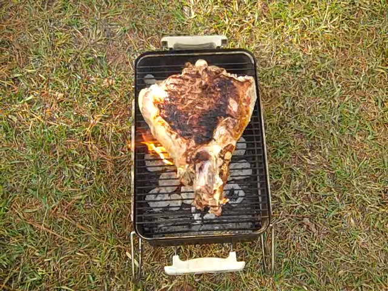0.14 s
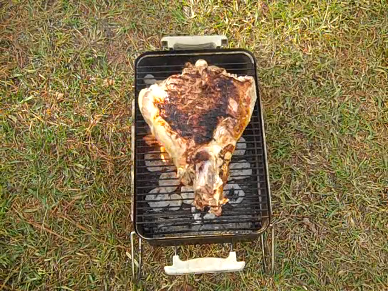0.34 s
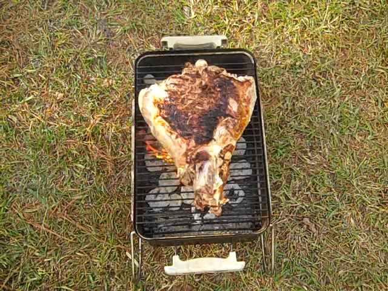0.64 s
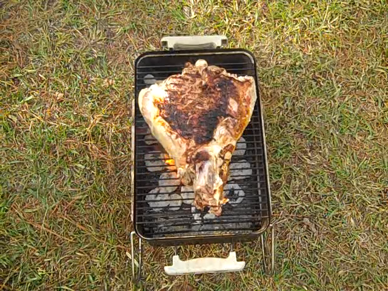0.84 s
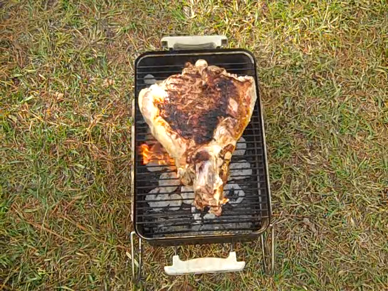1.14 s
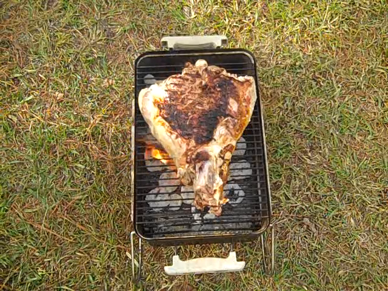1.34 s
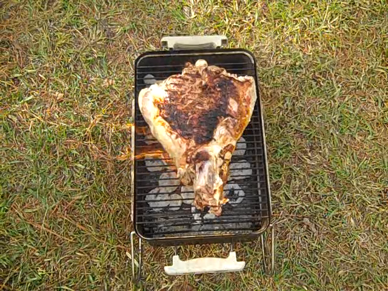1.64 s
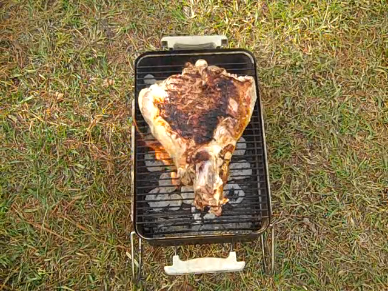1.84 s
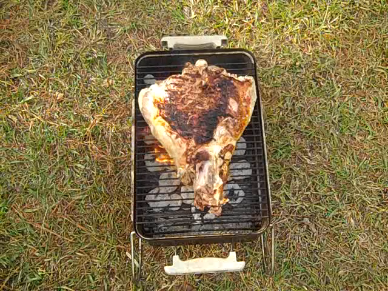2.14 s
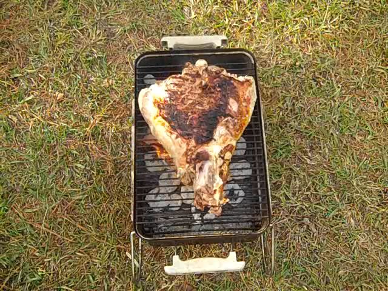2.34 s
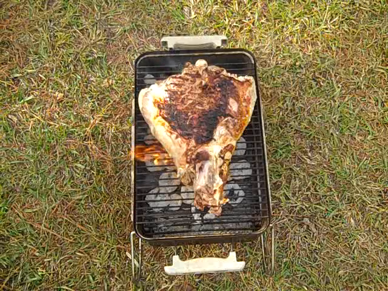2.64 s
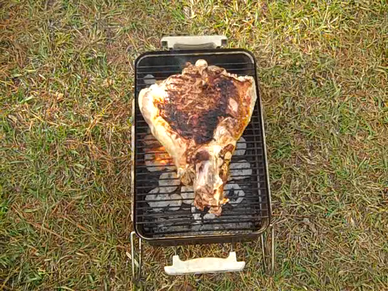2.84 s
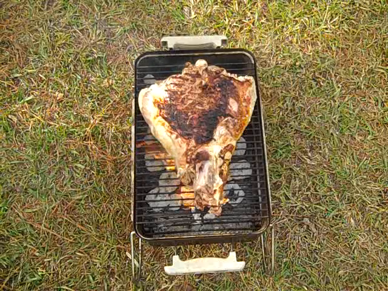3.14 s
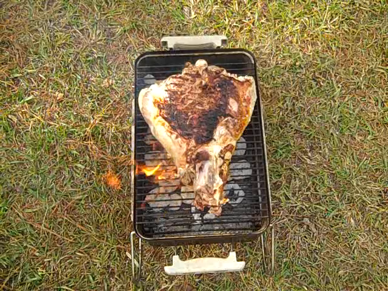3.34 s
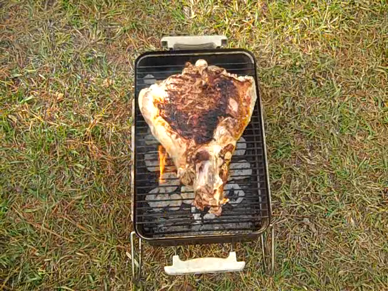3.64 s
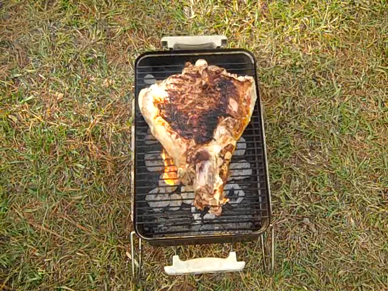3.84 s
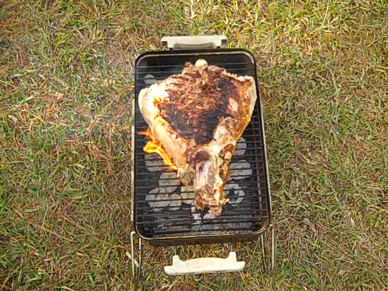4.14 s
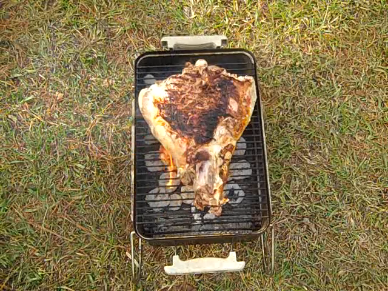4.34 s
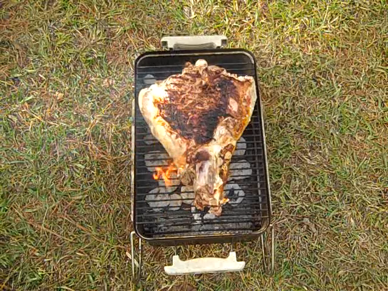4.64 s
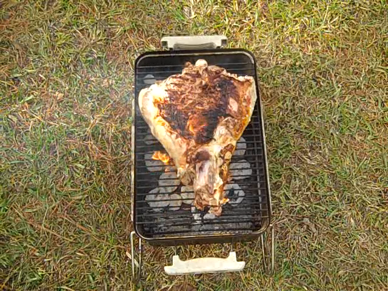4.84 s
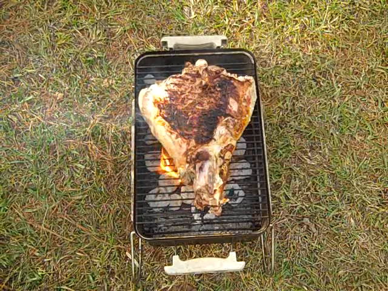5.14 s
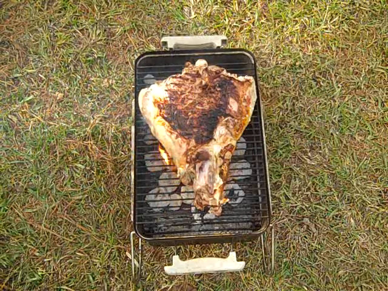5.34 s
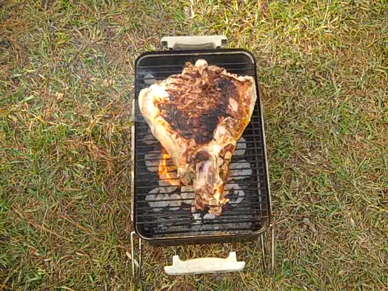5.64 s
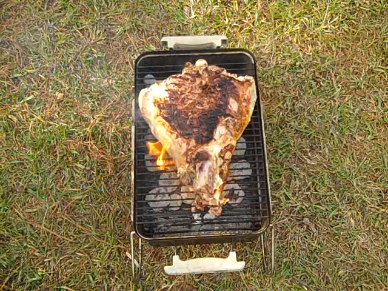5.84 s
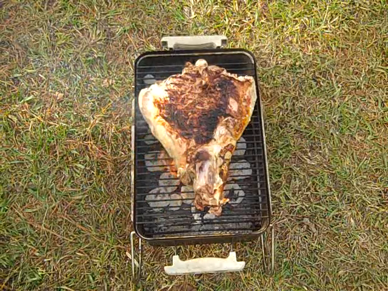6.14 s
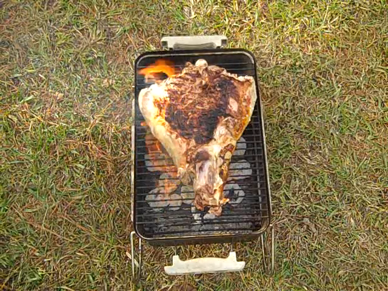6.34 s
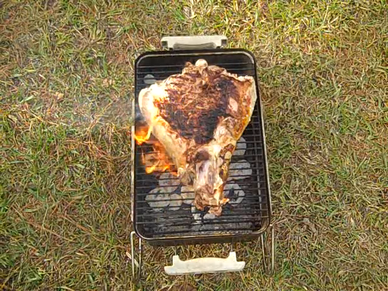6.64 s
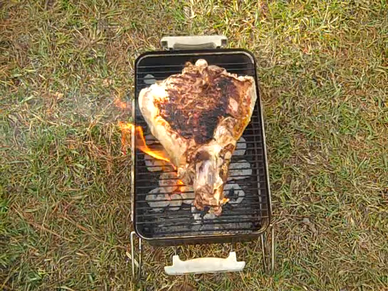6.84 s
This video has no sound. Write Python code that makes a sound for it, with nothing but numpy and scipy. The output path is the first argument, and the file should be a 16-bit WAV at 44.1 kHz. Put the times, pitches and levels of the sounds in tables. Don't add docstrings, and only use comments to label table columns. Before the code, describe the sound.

Close outdoor sound of meat sizzling on a small charcoal grill. A fine, bright, uneven hiss runs throughout, swelling briefly as fat drips on the coals. Sharp pops, thin spits and dry coal cracks scatter over it, with a few dull plops ringing in the shallow metal box. Very faint wind and low rumble lie underneath. One microphone about a metre above, dry and without echo.

```python
import sys
import numpy as np
from scipy import signal
from scipy.fft import rfft, irfft, next_fast_len
from scipy.io import wavfile
from scipy.ndimage import uniform_filter1d

SR = 44100
rng = np.random.default_rng(int(sys.argv[2]) if len(sys.argv) > 2 else 0)


def transcribe(signal):
    frames = np.atleast_2d(signal).T
    limited = np.clip(frames, -1, 1)
    pcm = np.round(limited * 32767).astype(np.int16)
    wavfile.write(sys.argv[1], SR, pcm)


def amplitude_ratio(level_db):
    exponent = np.asarray(level_db, float) / 20
    return 10 ** exponent


N = 308259
LEAD = 128


def unit(x):
    return x / np.sqrt(np.mean(x ** 2))


def colour(x, points):
    hz, db = np.transpose(points)
    size = next_fast_len(N + 4096)
    log_hz = np.log(np.arange(size // 2 + 1) * SR / size + 1e-9)
    gain = amplitude_ratio(np.interp(log_hz, np.log(hz), db))
    return irfft(rfft(x, size) * gain, size)[:N]


def ring(x, modes):
    return sum(amplitude_ratio(db) * signal.lfilter(*signal.iirpeak(hz, hz / width, SR), x) for hz, width, db in modes)


def fade(x, ms):
    return signal.lfilter([1], [1, -np.exp(-1000 / (ms * SR))], x)


def walk(rate):
    hold = int(SR / rate)
    steps = np.repeat(rng.standard_normal(N // hold + 1), hold)
    slewed = uniform_filter1d(uniform_filter1d(steps, hold), hold)
    return unit(slewed[:N])


def place(times, shapes):
    out = np.zeros(N + shapes.shape[1])
    starts = (times * SR).astype(int)[:, None]
    np.add.at(out, starts + np.arange(shapes.shape[1]), shapes)
    return out[:N]


def below(x, hz):
    return signal.sosfiltfilt(signal.butter(2, hz, fs=SR, output="sos"), x)


# time in seconds, treble sizzle level in dB.
SIMMER = [
    (0, -44.5),
    (.95, -45.5),
    (2.0, -42.5),
    (2.6, -43),
    (3.15, -44.5),
    (3.7, -43.5),
    (4.8, -45),
    (5.9, -45),
    (6.99, -46.5),
]
# middle in seconds, length in seconds, rise in dB,
# lean to the middle in dB.
FAT_DRIPS = [(0.252, .3, 4.5, 1), (.46, .06, 5, 0.5), (0.597, .06, 3, -2.5), (0.749, .08, 4, -3),
             (0.854, .07, 7.5, -1.5), (1.154, .08, 6.5, -1), (1.268, .07, 7, 0), (1.352, .07, 5.5, 1.5),
             (1.619, .12, 7.5, -4), (1.86, 0.09, 4, 0.5), (1.949, .12, 5.5, 0.5), (2.15, .07, 3, 1.5),
             (2.243, .06, 2.5, -3), (2.33, .06, 2, -0.5), (2.82, .14, 5.5, 2), (2.904, .06, 6, -1.5),
             (3.02, .14, 6, 0.5), (3.222, .08, 3, 2.5), (3.481, .14, 5.5, 0), (3.892, .08, 4.5, -3.5),
             (4.018, .09, 4.5, 0), (4.303, .16, 6.5, -0.5), (4.532, .16, 4.5, 2.5), (5.162, .3, 6.5, 4),
             (5.443, .07, 9, 0), (5.619, .07, 8, 1.5), (5.722, .12, 5, 1.5), (5.913, .08, 3, 2),
             (6.288, .12, 6, 1.5), (6.815, .1, 4, 3)]


def boiling():
    t = np.arange(0, N + 64, 64) / SR
    middle_s, length_s, rise_db, lean_db = np.transpose(FAT_DRIPS)[:, :, None]
    shape = np.exp(-np.abs(2 * (t - middle_s) / length_s) ** 2.2)
    added_power = np.sum((amplitude_ratio(rise_db) ** 2 - 1) * shape, axis=0)
    flare_db = 10 * np.log10(1 + np.maximum(added_power, 0))
    simmer_db = np.interp(t, *np.transpose(SIMMER))
    slow = simmer_db, flare_db, np.sum(lean_db * shape, axis=0)
    return [np.interp(np.arange(N) / SR, t, db) for db in slow]


# frequency in Hz, level in dB per Hz.
BURST_COLOUR = [(700, -26), (1000, -12), (1330, -7), (1630, -.5), (1900, -3), (3100, -5), (6000, 0),
                (7300, -1), (8900, 0), (11200, -5), (13300, -10)]
# frequency in Hz, width in Hz, level in dB.
FIRE_BOX = [
    (501, 150, -14),
    (710, 1050, -22.5),
    (1540, 420, -6),
    (2880, 240, -14),
]


def voices():
    click = (np.arange(N) == LEAD) * 1.
    direct = colour(click, BURST_COLOUR)
    lows = [below(direct, hz) for hz in (3500, 5300, 7600, 10500)] + [direct]
    hum = ring(ring(click, FIRE_BOX[:2]), [(602, 380, 0)])
    middle = lows[0] + amplitude_ratio(-8) * ring(click, FIRE_BOX[2:])
    return np.array([hum, middle, *np.diff(lows, axis=0)])[:, :8 * LEAD]


def sizzle(rate=900, spread_db=2.0, cap_db=10, steam_db=-1.5, own_db=7):
    simmer_db, flare_db, lean_db = boiling()
    treble_db = simmer_db + flare_db
    middle_db = -6 + (0.72 - 1) * flare_db + lean_db
    slow_flare_db = uniform_filter1d(flare_db, int(.08 * SR))
    hum_db = -7 + 0.56 * slow_flare_db - flare_db

    flutter = walk(30)
    chance = rng.random((2, N))
    born = chance[0] < rate / SR * amplitude_ratio(2.2 * flutter)
    size_db = np.minimum(-spread_db * np.log(chance[1] + 1e-9), cap_db)
    noise = rng.standard_normal(N)

    heard = voices()
    heard[2:] /= np.sqrt(np.sum(heard[2:].sum(axis=0) ** 2))
    heard[:2] /= np.sqrt(np.sum(heard[:2] ** 2, axis=1, keepdims=True))
    levels = [treble_db + hum_db - 3.5, treble_db + middle_db - 2.5] + [treble_db - 3] * 4
    out = 0
    for voice, db in zip(heard, levels):
        bursts = born * amplitude_ratio(size_db + own_db * rng.standard_normal(N).clip(-2, 1.5))
        gate = unit(unit(fade(bursts, .55)) + amplitude_ratio(steam_db))
        patchy_db = 1.2 * walk(3) + 1.6 * walk(9) + 1.1 * walk(25)
        level_db = db + 0.38 * flutter + patchy_db
        out = out + signal.oaconvolve(noise * gate, voice)[LEAD:N + LEAD] * amplitude_ratio(level_db)
    return out


# frequency in Hz, level in dB per Hz.
RUMBLE = [
    (12, -19),
    (20, 11),
    (75, 0),
    (285, -1.5),
    (555, 9),
    (912, -21),
    (1200, 6.5),
    (1560, -57),
    (2640, -120),
]


def air():
    swell, pressure = walk(8), walk(9)
    rumble = unit(colour(rng.standard_normal(N), RUMBLE))
    return rumble * amplitude_ratio(-60 + 2.0 * swell) + amplitude_ratio(-60.5) * pressure


def burst(events, crack_ms=.3, tail_ms=2.2, tail_db=-15, lean_db=3.0, own_db=4.0):
    s, top_db, middle_db, hum_db = np.transpose(events)
    ms = np.arange(400) * 1000 / SR
    noise = rng.standard_normal((len(s), 405))
    envelope = np.exp(-ms / crack_ms) + amplitude_ratio(tail_db) * np.exp(-ms / tail_ms)
    spray = noise[:, 5:] * envelope
    hum, middle, dull, clear, bright, fine = (signal.fftconvolve(spray, v[None], axes=1) for v in voices())

    lean = amplitude_ratio(lean_db * np.tanh(noise[:, :1]))
    own = amplitude_ratio(own_db * np.tanh(noise[:, 1:5])).T[:, :, None]
    dull_side = own[0] * dull + own[1] * clear
    bright_side = own[2] * bright + own[3] * amplitude_ratio(-4) * fine
    treble = dull_side / lean + bright_side * lean

    out = 0
    for sound, db in [(hum, top_db + hum_db - 5), (middle, top_db + middle_db - 5), (treble, top_db - 1)]:
        peak = np.sqrt(uniform_filter1d(sound ** 2, size=40, axis=1).max(axis=1))
        out = out + sound * (amplitude_ratio(db) / peak)[:, None]
    return place(np.maximum(s - LEAD / SR, 0), out)


def stray_droplets(count=600, over_sizzle_db=2.5, spread_db=2):
    chance = rng.random((count, 4))
    simmer_db, flare_db, _ = boiling()
    busy = np.cumsum(amplitude_ratio(flare_db))
    at = np.searchsorted(busy / busy[-1], chance[:, 0]).clip(0, N - 1)
    level_db = (simmer_db + 0.43 * flare_db)[at] + over_sizzle_db
    size_db = level_db - spread_db * np.log(chance[:, 1] + 0.088)
    return burst(list(zip(at / SR, size_db, 2 - 18 * chance[:, 2], -8 - 18 * chance[:, 3])))


# start in seconds, peak in dB, box ring minus treble in dB.
BOX_PLOPS = [(0.0649, -34, 0), (0.0982, -32.5, -1), (0.2434, -30.5, -1.5), (1.0283, -31, -1),
             (1.0678, -31, -2), (1.2633, -33.6, -4), (1.311, -37, 5), (1.3321, -31.5, -9),
             (1.405, -32.5, -1.5), (1.6453, -30.8, -6.6), (1.7556, -30, 3.5), (1.7811, -30.5, -2.5),
             (1.8838, -42, -25.2), (2.1655, -33, -4), (2.2079, -30.5, -7), (2.6122, -35, -0.5),
             (3.0015, -34, 1), (3.0387, -31, 1), (3.443, -34, 1.5), (3.6304, -42, -17),
             (3.7797, -33.5, -2.2), (4.3329, -29.5, -32.2), (4.7665, -32, -20), (5.3259, -31, -17),
             (5.5278, -31.5, -18), (5.5894, -37, -10), (5.703, -33, -6.4), (5.7236, -31, -10),
             (6.2935, -30.5, -12), (6.8462, -33, -6)]


def plops():
    return burst([(s, db, 3, box_db) for s, db, box_db in BOX_PLOPS])


# start in seconds, peak in dB.
LONE_DROPLETS = [(0.0744, -27), (0.6083, -26), (0.765, -24.5), (0.9825, -31), (1.1189, -33), (1.1419, -26),
                 (1.4421, -24), (2.0427, -23.5), (2.1295, -26.5), (2.152, -30), (2.2386, -28),
                 (2.3146, -22), (2.363, -24.5), (2.5106, -25.5), (2.5623, -27), (2.6594, -26.5),
                 (2.74, -29), (3.0907, -22), (3.114, -29.5), (3.3317, -24), (3.7344, -23.5), (3.8913, -26),
                 (4.1844, -27), (4.6708, -23), (4.9144, -24), (5.297, -23), (5.7947, -26), (6.3752, -22),
                 (6.6488, -33.5), (6.9, -23)]


def lone_droplets():
    return burst([(s, db - 6, -3.5, -10) for s, db in LONE_DROPLETS])


# start in seconds, treble peak in dB, middle minus treble in dB,
# box ring minus treble in dB.
BIG_DROPS = [(0.116, -24.5, -1, -6.5), (0.3389, -24.5, -2, -5.8), (0.4655, -25.5, -1.5, -15),
             (0.5092, -25, -0.5, -3.5), (1.5993, -21, -8, -19), (1.6098, -23.5, 1, -17),
             (1.6134, -28, 2, -15.9), (1.6384, -21.7, -2, -15), (1.6598, -19, -9, -18),
             (1.8926, -29.5, -6, -11), (2.8848, -29.5, 5, -1), (2.9247, -29, -1.6, -18),
             (2.9568, -29, -17, -24.3), (3.5003, -26, -1, -10.3), (3.5494, -26.5, -10, -25),
             (4.0002, -25.5, 2.4, -2), (4.0198, -30, 3.5, -25), (4.3272, -23, -2.9, -16.1),
             (4.3458, -24.5, -2, -5.5), (4.3531, -31.5, 1.7, -7), (4.38, -20.5, 1, -23),
             (4.559, -26, -6, -20.3), (4.6507, -21.5, -7, -20), (5.1246, -28, -2, -6),
             (5.3485, -28, 5, -13), (5.4436, -24.5, -7, -19), (5.466, -24, -12, -24.9),
             (5.5025, -30, 3, -10), (5.6327, -31, -2, -24.5), (5.7585, -21, -2.5, -13)]


def pops():
    return burst(list(BIG_DROPS))


# start in seconds, peak in dB.
COAL_CRACKS = [(0.261, -32), (0.3118, -30.5), (0.3234, -35), (0.4863, -26), (0.8706, -31), (1.2684, -27.5),
               (1.2743, -28), (1.3417, -26), (1.5948, -26), (1.6053, -31.7), (1.8071, -29), (1.9949, -31.6),
               (2.1084, -30.5), (2.8328, -31.7), (2.8656, -42), (2.9669, -30.5), (3.1878, -28.5),
               (3.2312, -29), (3.2463, -27.5), (3.2878, -30.5), (3.519, -31), (3.9756, -29.5),
               (4.3383, -27.5), (4.5317, -29.5), (4.8576, -28), (5.0033, -28), (5.0392, -30), (5.6019, -26),
               (6.0134, -28), (6.8167, -28)]


def cracks():
    return burst([(s, db, -4, -13) for s, db in COAL_CRACKS])


# time in seconds, peak in dB, sign and strength (push +, pull -).
STEAM_PUFFS = [(0.3114, -33, -1.1), (0.3245, -23, 0.68), (0.3389, -23.5, -1.1), (0.4656, -22, -0.81),
               (0.487, -25.5, -0.82), (0.511, -35, 0.88), (0.7814, -29, 0.83), (0.8708, -28, 0.82),
               (1.274, -32, 0.88), (1.61, -24.5, 0.9), (1.6387, -22.5, -1), (1.66, -13, 0.66),
               (1.893, -29, 0.59), (2.109, -30, -1.14), (2.6135, -31.5, 0.91), (2.8548, -31.5, 0.81),
               (2.8842, -36, 0.83), (3.2312, -37, -1.3), (3.5514, -34, 0.75), (3.78, -30, -0.86),
               (4.328, -31, 1), (4.344, -35, 1), (4.3812, -25, -1.8), (4.651, -28, -0.94),
               (5.3269, -31.5, 0.9), (5.4431, -26, -1.16), (5.451, -30, -0.87), (5.503, -23, -0.76),
               (6.013, -38, 1), (6.6506, -30, 0.74)]


def thumps(push_ms=0.4):
    s, db, sign = np.transpose(STEAM_PUFFS)
    ms = (np.arange(120) - 60) * 1000 / SR
    push = np.exp(-(2 * ms / push_ms) ** 2)
    return place(s - 60 / SR, push * (sign * amplitude_ratio(db + 2.0))[:, None])


# start in seconds, peak in dB.
SKIN_SPITS = [(0.4026, -29), (0.434, -31.5), (0.7726, -31), (1.1887, -33.5), (1.2885, -29), (1.3073, -29),
              (1.5917, -29.5), (1.856, -27), (1.9249, -28), (1.9991, -28.5), (2.0247, -28.1), (2.78, -28),
              (2.7933, -25.5), (2.892, -25), (3.025, -35), (3.4557, -28), (3.4958, -27.2), (3.8299, -27),
              (4.0377, -32), (4.244, -40), (4.802, -30.5), (5.0822, -28), (5.1183, -29.0), (5.3143, -27),
              (5.3592, -28), (5.4499, -25), (5.646, -33), (5.693, -29), (5.895, -28), (6.3936, -28.5)]


def spits():
    return burst([(s, db, -9.5, -10) for s, db in SKIN_SPITS])


def scene():
    drops = stray_droplets() + plops() + lone_droplets() + pops() + cracks() + spits()
    return (sizzle() + air() + drops + thumps())[None]


def roll_off(x):
    return signal.sosfilt(signal.butter(12, 14540, fs=SR, output="sos"), x)


def record(dry):
    hiss = unit(np.diff(rng.standard_normal(N + 1))) * amplitude_ratio(-57)
    top_cut = signal.ellip(10, .2, 60, 13200, fs=SR, output="sos")
    mix = signal.sosfilt(top_cut, dry + hiss) - 0.00063
    return roll_off(mix)


dry = scene()
out = record(dry)
transcribe(out)
```